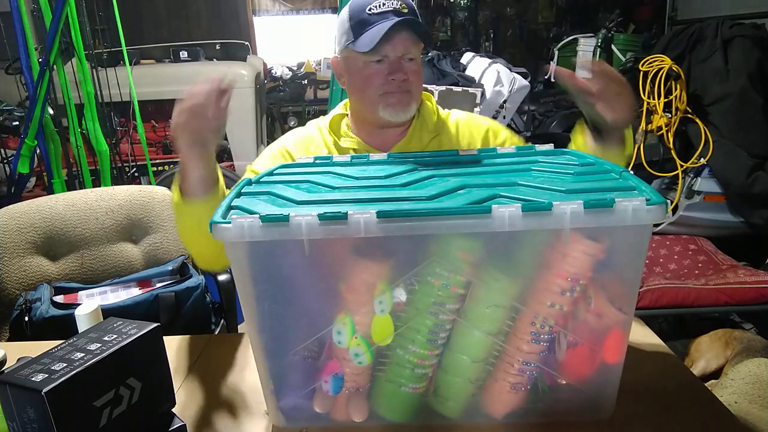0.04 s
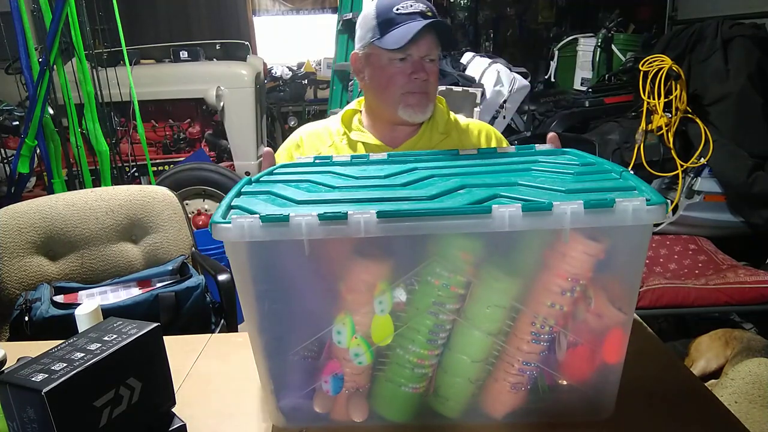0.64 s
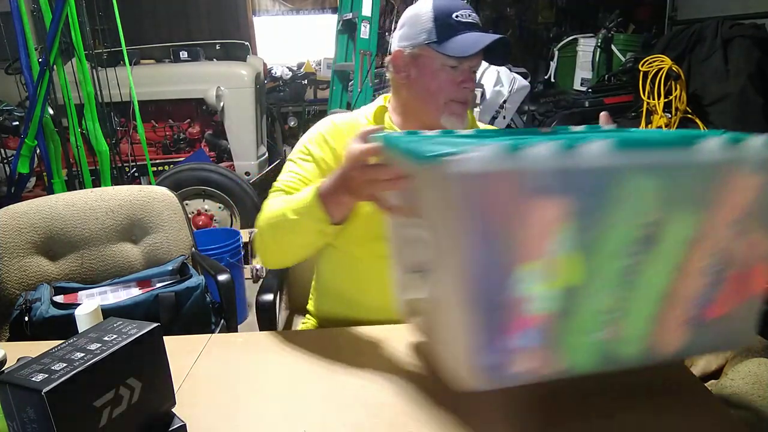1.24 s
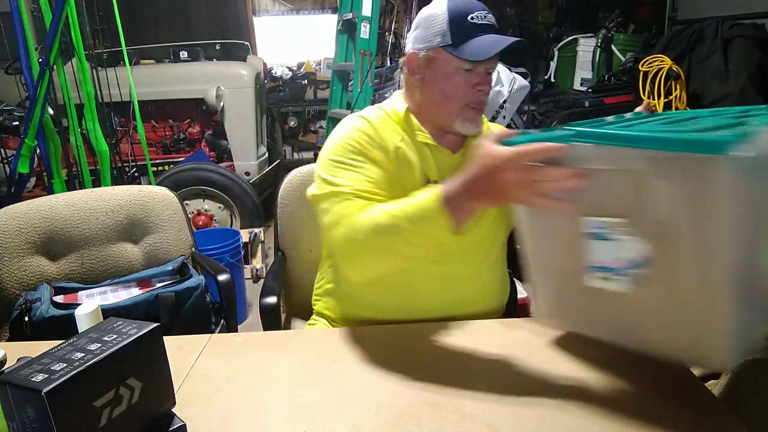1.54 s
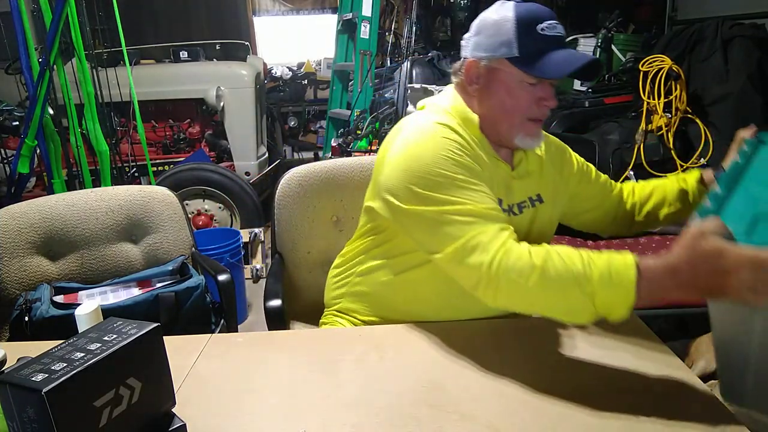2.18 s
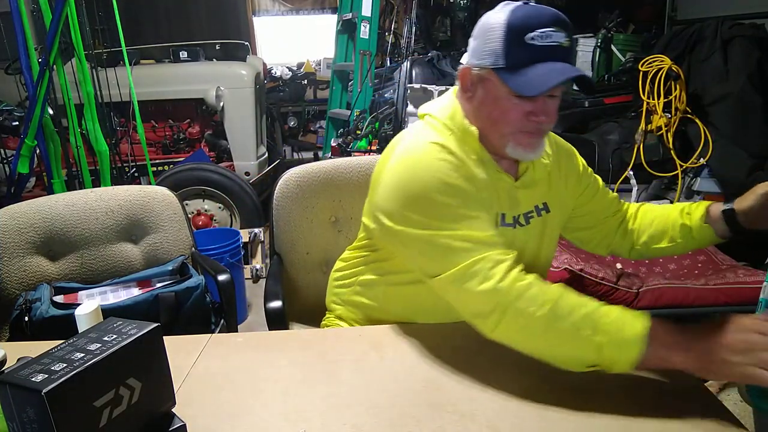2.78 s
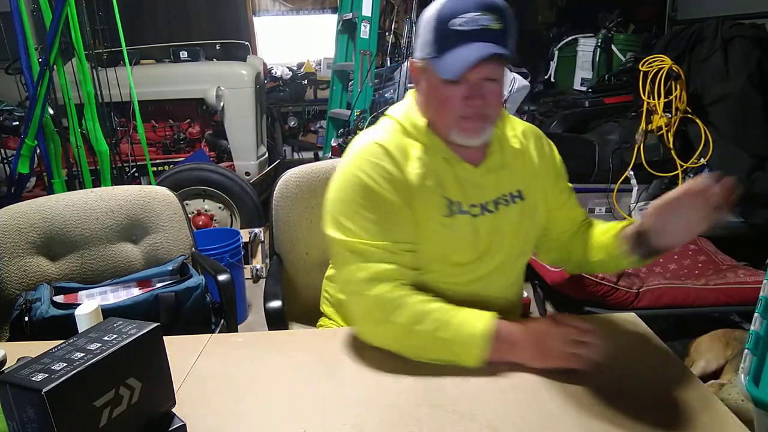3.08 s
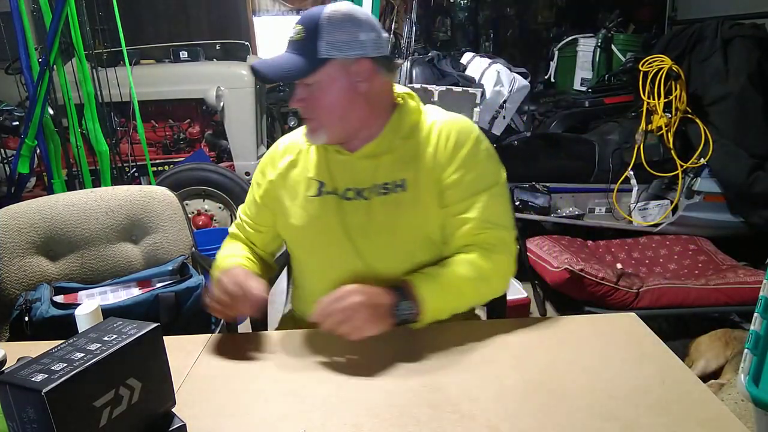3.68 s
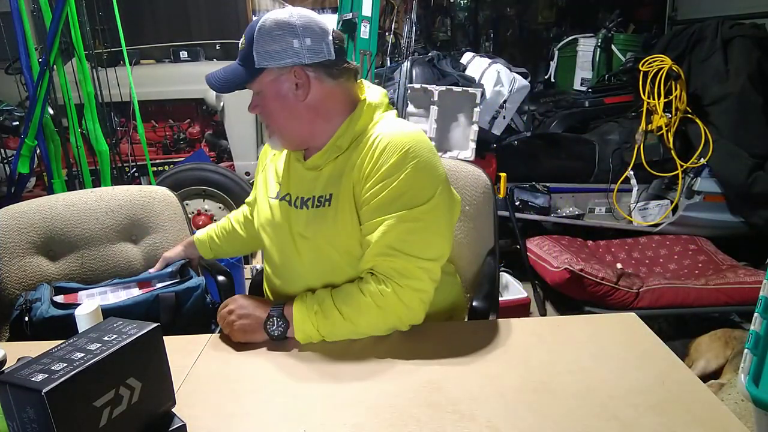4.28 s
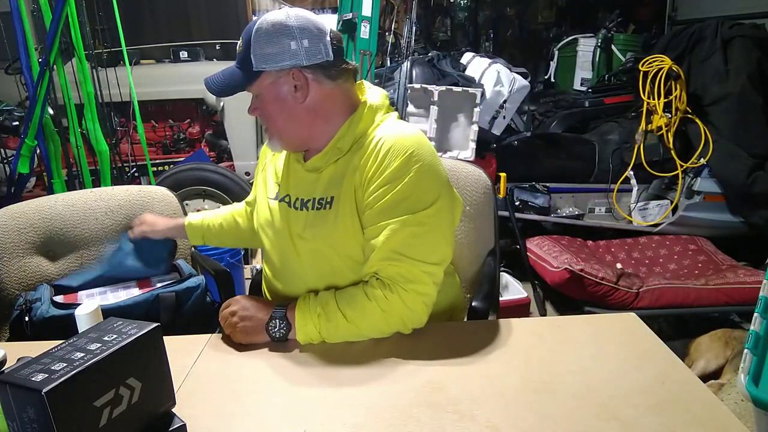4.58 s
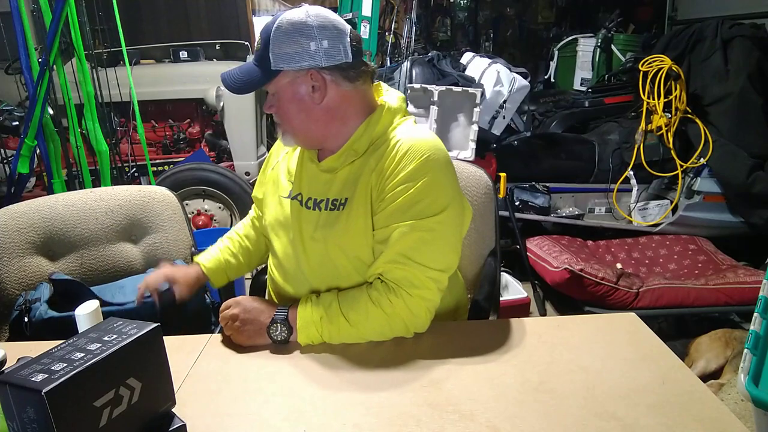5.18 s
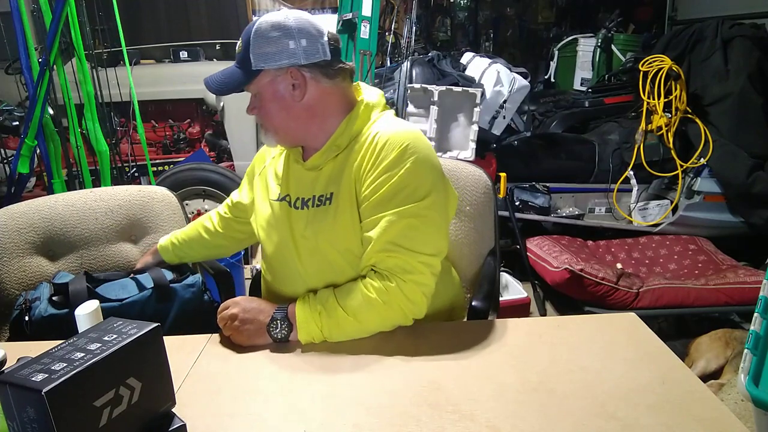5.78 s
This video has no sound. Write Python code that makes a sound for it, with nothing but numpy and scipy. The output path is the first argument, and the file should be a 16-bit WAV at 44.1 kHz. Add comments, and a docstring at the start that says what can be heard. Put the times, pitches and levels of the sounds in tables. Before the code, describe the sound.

Machines hum faintly and a distant fan whines throughout, in a small workshop heard in stereo with a short echo. Hands softly grip a plastic tote at about 0.7 seconds. From 0.9 seconds it scrapes over the table, knocking lightly while sleeves rub and slip on it. The sound moves left, with hollow bumps around 1.9 and 2.3 seconds. At 2.6 seconds comes the loudest moment: the tote lands with a boom and clatter, sharp plastic snaps, two tiny squeaks and a bright jingle of metal tackle inside. It rocks to rest by 3 seconds. Sleeves swish over the table near the centre until about 3.8 seconds. From 4.1 seconds a hand quietly brushes a fabric bag, slightly to the right, with a few small clicks. Its flap folds back with dull puffs near 4.9 and 5.6 seconds.

```python
"""A loaded plastic tote is dragged off a table, swung aside and set down.
Its hollow body booms and clatters, sleeves rub on it, the plastic snaps and squeaks, and metal
tackle jingles inside. Sleeves then swish over the table, and a hand folds back the flap of a
fabric bag, which lands with a dull puff. Machines hum and a distant fan whines. Two microphones
hear it all in a small, cluttered workshop."""
import sys
import numpy as np
from scipy import signal
from scipy.fft import rfft, irfft, next_fast_len
from scipy.io import wavfile
from scipy.ndimage import uniform_filter1d, map_coordinates

SR = 44100
rng = np.random.default_rng(int(sys.argv[2]) if len(sys.argv) > 2 else 0)


def wav_out(sig):
    """Save sig, one row per channel (or a flat mono array), as 16-bit PCM at SR to the path in sys.argv[1]."""
    wavfile.write(sys.argv[1], SR, np.round(np.clip(np.atleast_2d(sig).T, -1, 1) * 32767).astype(np.int16))


N = 261513
TIME = np.arange(N) / SR

# The tone colours of the noises. Each row: pitch in Hz, relative level in dB.
AIR_COLOUR = [(20, -20.5), (50, -23.5), (100, -18.5), (160, -1), (220, -8.5), (290, -22), (400, -23),
              (500, -30), (1100, -32.5), (2500, -35), (4500, -37.5), (7000, -40), (10000, -35.5),
              (15000, -42.5)]
WALL_COLOUR = [(30, -36), (80, -10), (150, 6), (260, 5.5), (360, 0.5), (450, -10.5), (700, -3), (1300, -6),
               (1900, -6), (3000, -14.5), (4200, -22), (8000, -30.5), (16000, -40.5)]
TOTE_HISS_COLOUR = [(1500, -39.5), (4200, -9), (4750, -17), (6100, -8), (7800, -7), (8250, -5),
                    (8700, -2.5), (9400, -4), (10500, 0), (11250, 2.5), (12900, -3), (13450, -0.5),
                    (15000, -3.5), (15800, -12.5)]
TOTE_RASP_COLOUR = [(90, -27), (200, -13), (400, -15), (650, -7.5), (1120, -5), (1700, -10.5), (2330, 2),
                    (2500, -1.5), (2750, 1), (3020, 1), (3220, -1.5), (3500, -7), (3800, -8.5),
                    (4150, -8.5), (4750, -5.5), (7000, -21.5)]
DRAG_COLOUR = [(100, -31), (250, -15), (600, 3), (820, 0.5), (940, 0), (1100, -2.5), (1400, -6.5),
               (2200, -11), (4000, -18.5), (9000, -31.5)]
CLICK_COLOUR = [(300, -42.5), (1000, -22.5), (2500, -11), (4500, -0.5), (8000, -3.5), (11000, 4),
                (16000, -6.5)]
CLOTH_HISS_COLOUR = [(1500, -18), (4700, -9), (5500, -5), (6900, 0), (7700, -3.5), (8600, 0.5), (9400, 0),
                     (10800, 4), (12500, 2.5), (14300, 0), (15800, -4)]
SLEEVE_RASP_COLOUR = [(120, -23), (400, -4.5), (1100, -3.5), (1600, -9), (2200, 3.5), (3000, 1), (3850, -4),
                      (4150, -2.5), (4700, -4), (7000, -11.5)]
PUFF_COLOUR = [(25, -30), (70, -5), (150, 3), (330, -0.5), (480, -5.5), (720, -2), (950, -5.5),
               (1400, -4.5), (1750, -6.5), (2300, -18), (4000, -21.5), (9000, -19.5)]
BAG_RASP_COLOUR = [(120, -28), (400, -31), (1200, -28), (1750, -2), (2400, -1.5), (3100, -1), (4100, -4),
                   (4700, -5), (7000, -9)]
# Running machines. Each row: pitch in Hz, level in dB.
HUM_TONES = [(58.9, -73), (96, -72.5), (111.5, -62), (120, -65), (196, -85)]
# A distant fan. Each row: middle pitch in Hz, width in Hz, level in dB.
FAN_BANDS = [(762, 67, -91.5), (1790, 90, -94.5), (3000, 80, -95), (3900, 130, -88.5), (10700, 1100, -90.5)]
# Things that hit. Each row: start in seconds, level in dB.
PALM_GRIPS = [(0.351, -57.5), (0.727, -41), (0.859, -43.5), (0.926, -50)]  # hands take hold of the tote
TOTE_KNOCKS = [(1.053, -53), (1.082, -40), (1.144, -57), (1.227, -51), (1.368, -52), (1.508, -50),
               (1.572, -52.5), (1.925, -41), (2.41, -45), (2.453, -42), (2.53, -41), (2.5903, -15.5),
               (2.598, -21.5), (2.6141, -22.5), (2.688, -35.5), (2.727, -30.5), (2.8, -38.5), (2.845, -40),
               (2.902, -50), (2.987, -52)]  # it jolts, lands and rocks to rest
WALL_BUMPS = [(1.857, -32.5), (2.064, -42), (2.325, -36)]  # it lurches
WEIGHT_DROPS = [(1.869, -47), (2.597, -47)]  # its whole weight comes down
TACKLE_SHAKES = [(2.40, -43), (2.517, -35), (2.62, -29), (2.63, -14.5), (2.649, -23.5), (2.685, -36.5),
                 (2.764, -21.5)]
SOFT_LANDINGS = [(3.176, -54.5), (3.651, -50), (4.685, -57.5), (4.76, -61), (4.786, -52.5), (4.811, -49.5),
                 (4.849, -51.5), (4.886, -42), (4.911, -44.5), (5.555, -37), (5.568, -41), (5.601, -49.5)]  # arms on the table, then the bag's flap
# The notes things ring with. Each row: pitch in Hz, relative level in dB, seconds to fade by 60 dB.
TOTE_NOTES = [(58.5, -33, .35), (90.3, -13, 0.13), (108.7, -10, 0.85), (157.6, 4.5, 0.22),
              (187.6, -2.5, 0.34), (242.2, -1.5, 0.32), (270.7, -5.5, 0.33), (318, -5.5, 0.26),
              (347, -4.5, 0.14), (493, -15.5, 0.087), (565, -24, 0.067), (680, -20.5, .15)]
TACKLE_NOTES = [(4140, -16, .18), (3915, -14, 0.33), (6400, -10, 0.13), (8807, -8.5, .09), (9000, -14, .06),
                (10400, -6, .09), (10710, 0, 0.14), (10680, -6, .08), (10800, -5.5, .06), (11270, -4, .06),
                (11990, -4.5, .05), (12230, -2.5, .06), (12500, -3.5, .05), (12400, 4.5, 0.12),
                (13500, 0, .08), (14920, -4.5, 0.11), (15050, 0, .1), (15600, -5, .04)]
# Smooth strokes of cloth. Each row: start and length in seconds, hiss in dB, rasp in dB above the hiss.
TOTE_STROKES = [(.425, 0.25, -68, -2), (0.828, .13, -62.5, -6), (0.898, .25, -46, -9)]
SLEEVE_STROKES = [(3.0, .16, -46.5, -35.5), (3.13, 0.19, -50, -22), (3.295, 0.18, -42.5, -15),
                  (3.355, .28, -30.5, -10), (3.59, 0.22, -48.5, -7.5)]
BAG_STROKES = [(4.085, 0.17, -60.5, -19), (4.21, 0.16, -54, -1.5), (4.29, 0.24, -61.5, -5.5),
               (4.45, .14, -54.5, -10), (4.565, 0.079, -58.5, -11), (4.776, 0.14, -49, -17.5),
               (5.096, .09, -59.5, -18), (5.165, 0.128, -52, -30), (5.22, 0.31, -73, 4),
               (5.365, 0.34, -65.5, 4), (5.522, 0.05, -46, -6.5), (5.59, 0.13, -55.5, -6.5)]
# Cloth and hands slip on the tote. Each row: start and length in seconds, hiss in dB.
TOTE_SKIDS = [(0.75, 0.048, -48.5), (.781, 0.025, -38.5), (1.121, 0.031, -38.5), (1.197, 0.026, -37.5),
              (1.259, 0.065, -43), (1.308, 0.045, -43), (1.366, 0.0321, -40.5), (1.405, .028, -40),
              (1.471, 0.019, -37.5), (1.56, .02, -53), (1.613, 0.27, -33.5), (1.855, 0.15, -36.5),
              (1.993, 0.025, -29.5), (2.037, 0.035, -30), (2.148, 0.036, -27), (2.19, 0.042, -31.5),
              (2.309, 0.069, -34.5), (2.388, 0.049, -33.5), (2.46, 0.044, -40.5), (2.513, 0.018, -25),
              (2.568, 0.059, -35.5), (2.636, .065, -27), (2.763, 0.04, -33), (2.83, 0.099, -46),
              (2.97, 0.008, -32)]
# Cloth slips as it lands. Each row: start and length in seconds, hiss in dB, rasp in dB above the hiss.
CUFF_SKIDS = [(3.649, 0.024, -27, -24), (3.745, 0.034, -39.5, -11)]
FLAP_SKIDS = [(4.886, 0.053, -47, -5), (5.555, 0.023, -43, 1)]
# How loudly the tote and its load slide. Each row: time in seconds, level in dB.
DRAG_LEVELS = [(.87, -91), (.94, -55.5), (1.05, -48.5), (1.08, -66), (1.22, -57.5), (1.61, -64.5),
               (1.65, -48), (2.2, -47.5), (2.29, -57.5), (2.36, -43), (2.5, -51.5), (2.7, -41), (2.97, -56),
               (3.14, -84)]
# Plastic and buckles snap. Each row: start in seconds, level in dB, left above right in dB.
CLICKS = [(1.084, -26.5, 8), (2.568, -12, 6), (2.5694, -6.5, 5), (2.615, -4, 7), (2.6211, -12.5, -15.5),
          (2.805, -7, 7), (4.592, -25.5, 2.5), (5.526, -29, 22.5), (5.557, -23, -6)]
# The plastic squeaks. Each row: start and length in seconds, level in dB.
PLASTIC_SQUEAKS = [(2.654, .08, -45.5), (2.752, 0.044, -39)]
# Where the action is. Each row: time in seconds, sine of its angle (positive is left).
DIRECTION = [(0, -0.14), (1.0, 0.38), (1.6, 0.72), (2.8, 0.89), (3.3, 0.13), (3.7, -0.051), (4.3, -0.27),
             (5.9, -0.3)]
# How long the room echoes. Each row: pitch in Hz, seconds to fade by 60 dB.
ECHO_TIMES = [(100, .3), (500, 0.34), (2500, 0.36), (8000, 0.41), (15000, 0.29)]
# How strongly it echoes. Each row: pitch in Hz, relative level in dB.
ECHO_COLOUR = [(100, -16.5), (250, -9.5), (600, -4.5), (2000, -1), (15000, 0.5)]
# How alike it sounds at both microphones. Each row: pitch in Hz, likeness from 0 to 1.
MIC_LIKENESS = [(100, 0.89), (250, 0.5), (500, 0.8), (900, 0.08), (15000, 0.0095)]


def amp(db):
    return 10 ** (np.asarray(db) / 20)


def unit(x):
    """Scale a sound to an average strength (rms) of 1."""
    return x / np.sqrt(np.mean(x ** 2) + 1e-20)


def fade(t, t60):
    """Die away by 60 dB every t60 seconds."""
    return np.exp(-np.log(1000) * t / t60)


def at_pitch(table, hz):
    pitches, values = np.transpose(table)
    return np.interp(np.log(hz + 1), np.log(pitches + 1), values)


def add(mix, start, sound):
    part = mix[round(start * SR):][:len(sound)]
    part += sound[:len(part)]


def noise(colour, tilt_db=0, size=N):
    """Noise of a given colour, made brighter by tilt_db for each octave."""
    padded = next_fast_len(size, True)
    hz = np.fft.rfftfreq(padded, 1 / SR)
    gain = amp(at_pitch(colour, hz) + tilt_db * np.log2(np.maximum(hz, 150)))
    phases = np.exp(2j * np.pi * rng.random(len(hz)))
    return unit(irfft(gain * phases, padded)[:size])


def flutter(rate_hz, depth_db, size=N):
    """A level that wavers at random."""
    at = np.arange(size) * min(rate_hz / SR, 1)
    return unit(amp(depth_db * np.interp(at, np.arange(size), rng.standard_normal(size))))


def ring(notes, t, scatter_db, detune, tilt_db=0):
    """A struck object rings with fading notes; each blow lands elsewhere and mixes them anew."""
    hz, db, t60 = np.transpose(notes)[:, :, None]
    weight, bend, side = rng.standard_normal((3, len(notes), 1))
    level = amp(db + scatter_db * weight + tilt_db * np.log2(hz)) * np.sign(side)
    waves = np.sin(2 * np.pi * hz * (1 + detune * bend) * t) * fade(t, t60)
    return (level * waves).sum(0) / np.linalg.norm(level)


def fan_whine():
    """A distant fan makes narrow bands of noise that waver."""
    hz = np.fft.rfftfreq(N, 1 / SR)
    power = sum(amp(db) ** 2 / width * np.exp(-np.pi * ((hz - middle) / width) ** 2)
                for middle, width, db in FAN_BANDS)
    gain = np.sqrt(power * N * SR / 2)
    return np.array([irfft(gain * np.exp(2j * np.pi * rng.random(len(hz))), N) * flutter(6.4, 3.5)
                     for _ in "LR"])


def machines(air_db=-72):
    """Close hum tones beat against each other over a faint rumble and the fan."""
    hum = sum(amp(db) * np.sqrt(2) * np.sin(2 * np.pi * (hz * TIME + rng.random())) * flutter(1.9, -3)
              for hz, db in HUM_TONES)
    air = amp(air_db) * np.array([noise(AIR_COLOUR), noise(AIR_COLOUR)])
    return hum + spread(air + fan_whine())


def blows(typical_db=-36.5, load_lag_s=.022):
    """List the blows on the tote: start in seconds, level in dB, clatter in dB, tilt in dB an octave."""
    hard = []
    for start, db in [*TOTE_KNOCKS, *WALL_BUMPS]:
        force_db = db - typical_db  # harder blows boom more and are brighter
        hard.append((start, db, 3 - 0.23 * force_db, -1.05 + 0.0252 * force_db))
    # the load follows each bump, heavier and duller
    load = [(start + load_lag_s, db + 4, 1.5, -4) for start, db in WALL_BUMPS]
    palms = [(start, db, -20, -20.5) for start, db in PALM_GRIPS]
    return hard + load + palms


def knocks(clatter_t60=0.1, crack_s=0.0032, swell_s=0.0036, low_hz=76):
    """The hollow tote booms on a few low notes while its thin walls crack and clatter."""
    out, t = np.zeros(N), TIME[:SR // 2]
    wall_fade = 0.55 * fade(t, clatter_t60) + 1.13 * np.exp(-t / crack_s)
    swell = 1 - np.exp(-t / swell_s)
    for start, db, clatter_db, tilt_db in blows():
        walls = noise(WALL_COLOUR, tilt_db, len(t)) * wall_fade
        boom = ring(TOTE_NOTES, t, scatter_db=0, detune=.015, tilt_db=tilt_db + 3.6) * swell
        add(out, start, amp(db) * (boom + amp(clatter_db) * walls))
    # a box this size gives off little deep bass
    return signal.sosfilt(signal.butter(2, low_hz, "high", fs=SR, output="sos"), out)


def stroke(length):
    """The speed of a smooth stroke, fastest a little before the middle."""
    progress = np.arange(0, length, 1 / SR) / length
    return np.abs(np.sin(np.pi * progress ** 0.75)) ** 2.23


def skid(length, typical_s=0.031, stop_s=.011):
    """The speed of cloth that breaks free, slows and stops; short skids slow down most."""
    t = TIME[:SR // 2]
    rise_s = 0.11 * length
    slowing_db = 13 * (typical_s / length) ** 0.71
    speed = np.minimum(t / rise_s, 1) * amp(-slowing_db * np.clip((t - rise_s) / length, 0, 1))
    return speed * np.exp(-np.maximum(t - rise_s - length, 0) / stop_s)


def rub(speed, hiss, rasp, rasp_db, tilt_db, grip_hz, grip_db):
    """Sliding fibres hiss, pressure adds a rasp, and the uneven grip makes both flutter."""
    size = len(speed)
    fibres = noise(hiss, tilt_db, size) + amp(rasp_db) * noise(rasp, size=size)
    return speed * fibres * flutter(grip_hz, grip_db, size)


def tote_rubs(typical_db=-35.5, typical_s=0.031):
    """Sleeves sweep along the tote; under load they stick and slip."""
    out = np.zeros(N)
    colours = TOTE_HISS_COLOUR, TOTE_RASP_COLOUR
    for start, length, db, rasp_db in TOTE_STROKES:
        swish = rub(stroke(length), *colours, rasp_db, tilt_db=-2, grip_hz=347, grip_db=2.5)
        add(out, start, amp(db) * swish)
    for start, length, db in TOTE_SKIDS:
        # firmer and longer skids rasp more
        rasp_db = -11 + 0.2 * (db - typical_db) + 2 * np.log2(length / typical_s)
        # the hiss dulls as the tote swings aside
        tilt_db = -15 * (np.interp(start, *np.transpose(DIRECTION)) - 0.62)
        swish = rub(skid(length), *colours, rasp_db, tilt_db, grip_hz=347, grip_db=2.5)
        add(out, start, amp(db) * swish)
    return out


def dragging():
    """The tote scrapes over the table and its load slides; once lowered, the hollow box rumbles too."""
    level = amp(np.interp(TIME, *np.transpose(DRAG_LEVELS), left=-np.inf, right=-np.inf))
    lowered = np.interp(TIME, [1.8, 2.4], [0, 1])
    rumble = noise([(50, -34.5), (110, -7.5), (170, 1), (350, 0), (480, -4.5), (900, -28)])
    scrape = noise(DRAG_COLOUR) * flutter(220, 4)
    return level * (scrape + lowered * rumble * flutter(60, 1))


def snaps(decay_s=0.00056):
    """Plastic and buckles give bright clicks about a millisecond long."""
    out, t = np.zeros((2, N)), TIME[:SR // 100]
    for start, db, left_db in CLICKS:
        click = amp(db - 7) * noise(CLICK_COLOUR, size=len(t)) * np.exp(-t / decay_s)
        add(out[0], start, click * amp(left_db / 2))
        add(out[1], start, click * amp(-left_db / 2))
    return out


def thuds(hz=54, rise_s=.018):
    """The tote's weight comes down with one deep note that soon dies."""
    out, t = np.zeros(N), TIME[:SR // 2]
    thud = np.sin(2 * np.pi * hz * t) * (1 - np.exp(-t / rise_s)) * fade(t, t60=.4)
    for start, db in WEIGHT_DROPS:
        add(out, start, amp(db) * thud)
    return out


def jingles(tick_s=0.00023, strikes=7, shake_t60=.1):
    """Small metal pieces hit each other ever more weakly, with a tick and a short ring each time."""
    out, t = np.zeros(N), TIME[:SR // 3]
    for start, db in TACKLE_SHAKES:
        uneven_steps = np.arange(strikes) + np.r_[0, rng.random(strikes - 1)]
        for delay in shake_t60 / 3 * uneven_steps / strikes:
            tick = amp(3) * noise(CLICK_COLOUR, size=len(t)) * np.exp(-t / tick_s)
            metal = ring(TACKLE_NOTES, t, scatter_db=3, detune=.002)
            add(out, start + delay, amp(db) * fade(delay, shake_t60) * (tick + metal))
    return out


def squeaks(hz=3900, wobble_share=.003):
    """Plastic squeaks on one unsteady pitch as the tote settles."""
    out = np.zeros(N)
    for start, length, db in PLASTIC_SQUEAKS:
        speed = stroke(length)
        wobble = unit(uniform_filter1d(rng.standard_normal(len(speed)), SR // 200))
        tone = np.sin(2 * np.pi * np.cumsum(hz * (1 + wobble_share * wobble)) / SR)
        add(out, start, amp(db) * speed * tone * flutter(150, 2, len(speed)))
    return out


def sleeves():
    """Forearms sweep over the table top, and cuffs slip as the hands land."""
    out = np.zeros(N)
    for motion, rows in (stroke, SLEEVE_STROKES), (skid, CUFF_SKIDS):
        for start, length, db, rasp_db in rows:
            swish = rub(motion(length), CLOTH_HISS_COLOUR, SLEEVE_RASP_COLOUR, rasp_db,
                        tilt_db=-0.4, grip_hz=697, grip_db=4)
            add(out, start, amp(db) * swish)
    return out


def flops(rise_s=0.0018, typical_db=-45):
    """Padded fabric lands with a dull puff; harder landings are shorter and brighter."""
    out, t = np.zeros(N), TIME[:SR // 2]
    for start, db in SOFT_LANDINGS:
        force_db = db - typical_db
        shape = np.minimum(t / rise_s, 1) * fade(t, t60=.17 * .5 ** (force_db / 11))
        puff = noise(PUFF_COLOUR, tilt_db=-1 + 0.47 * force_db, size=len(t))
        add(out, start, amp(db) * shape * puff)
    return out


def bag_rustle():
    """A hand brushes over the bag and folds back its flap."""
    out = np.zeros(N)
    for motion, rows in (stroke, BAG_STROKES), (skid, FLAP_SKIDS):
        for start, length, db, rasp_db in rows:
            tilt_db = -0.5 - 0.51 * rasp_db  # a light touch is bright, a rasping one duller
            swish = rub(motion(length), CLOTH_HISS_COLOUR, BAG_RASP_COLOUR, rasp_db,
                        tilt_db, grip_hz=595, grip_db=3)
            add(out, start, amp(db) * swish)
    return out


def spread(pair):
    """Sound from all around reaches two close microphones alike in the bass, unlike in the treble."""
    size = next_fast_len(pair.shape[1], True)
    left, other = rfft(pair, size)
    likeness = np.clip(at_pitch(MIC_LIKENESS, np.fft.rfftfreq(size, 1 / SR)), -1, 1)
    right = likeness * left + np.sqrt(1 - likeness ** 2) * other
    return irfft([left, right], size)[:, :pair.shape[1]]


def workshop(sound, echo_db, early_s=0.025, first_echo_s=0.0022, mic_gap_m=.14):
    """Sound reaches the nearer microphone first, then echoes off the table and shelves."""
    pair = sound * np.ones((2, 1))
    lead_samples = np.interp(TIME, *np.transpose(DIRECTION)) * mic_gap_m / 2 / 343 * SR
    direct = np.array([map_coordinates(channel, [np.arange(N) + side * lead_samples], order=3)
                       for channel, side in zip(pair, (1, -1))])
    t = TIME[:SR // 2]
    bounces = rng.choice([-1., 1.], (2, len(t))) * (rng.random((2, len(t))) < .1) * (t > first_echo_s)
    bounces *= 1 + amp(5) * np.exp(-t / early_s)  # early bounces are stronger
    hz, age, bands = signal.stft(bounces, SR, nperseg=256)
    bands *= amp(at_pitch(ECHO_COLOUR, hz))[:, None] * fade(age, at_pitch(ECHO_TIMES, hz)[:, None])
    tail = spread(signal.istft(bands, SR, nperseg=256)[1])
    tail /= np.linalg.norm(tail, axis=1, keepdims=True)
    echo = signal.fftconvolve(pair, tail, axes=1)[:, :N]
    return (direct + amp(echo_db) * echo) / np.hypot(1, amp(echo_db))


def scene():
    """Cloth is heard mostly through the room's echo; blows and snaps arrive more directly."""
    arms = workshop(tote_rubs() + sleeves(), echo_db=10)
    fabric = workshop(bag_rustle() + flops(), echo_db=2)
    body = amp(2.5) * (knocks() + thuds() + dragging())
    tote = workshop(body + jingles() + squeaks(), echo_db=-0.5)
    return arms + fabric + tote + workshop(snaps(), echo_db=-2.5) + machines()


def record(dry, top_hz=15900):
    """Each microphone favours different pitches, and the highest treble is cut off."""
    # Each pair: pitch in Hz, left above right in dB.
    balance = [(100, 1.0), (4000, -0.5), (8800, 2.0), (10500, -0.5), (12500, -4.5), (15500, 0.5)]
    size = next_fast_len(N, True)
    lean_db = at_pitch(balance, np.fft.rfftfreq(size, 1 / SR)) / 2
    heard = irfft(rfft(dry, size) * amp([lean_db, -lean_db]), size)[:, :N]
    treble_cut = signal.firwin(511, top_hz, window=("kaiser", 9), fs=SR)
    return signal.oaconvolve(heard, treble_cut[None], "same", axes=1)


dry = scene()
out = record(dry)
wav_out(out)
```